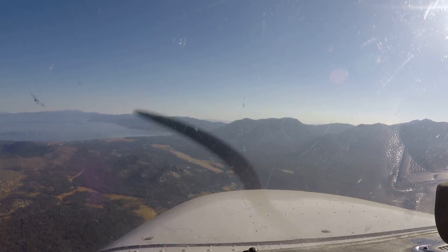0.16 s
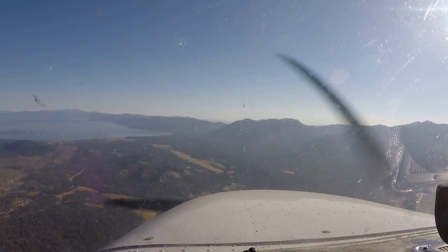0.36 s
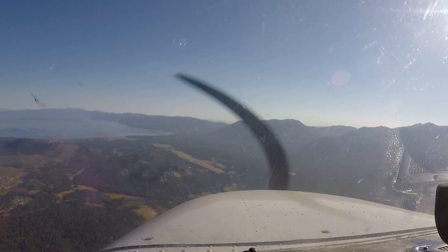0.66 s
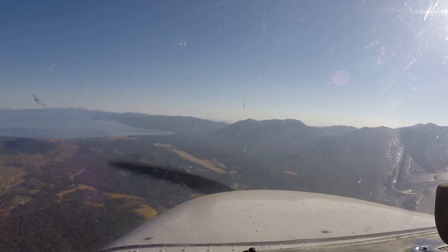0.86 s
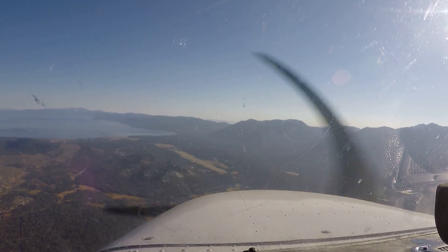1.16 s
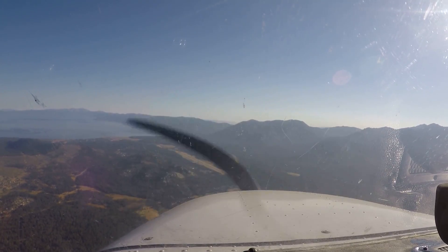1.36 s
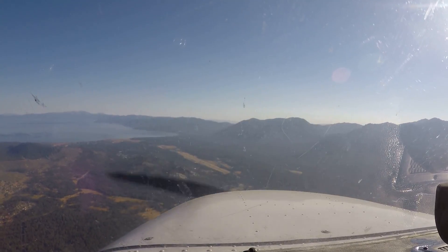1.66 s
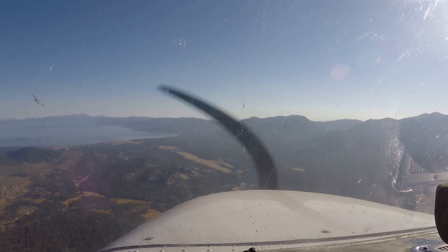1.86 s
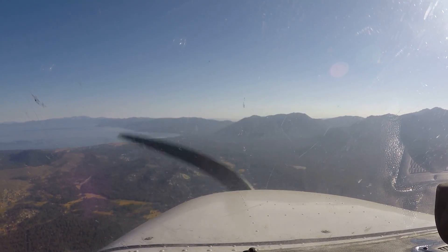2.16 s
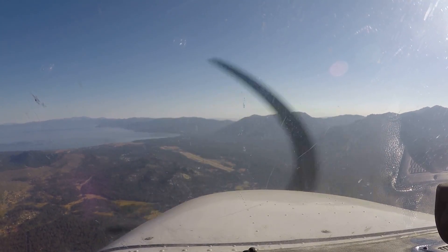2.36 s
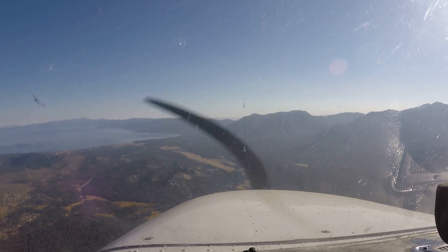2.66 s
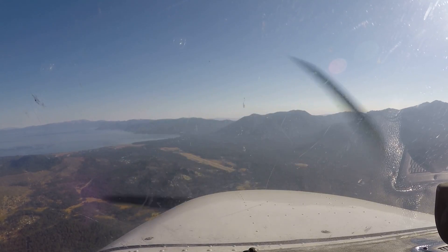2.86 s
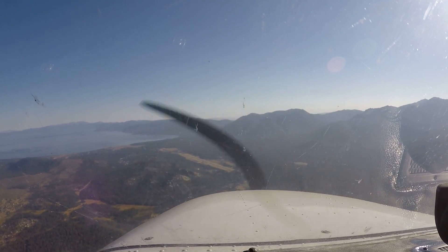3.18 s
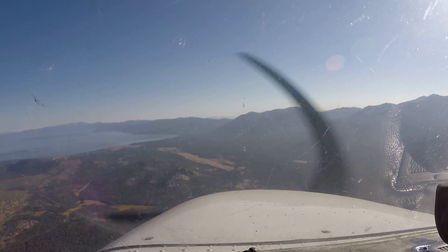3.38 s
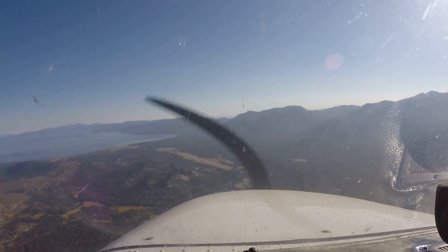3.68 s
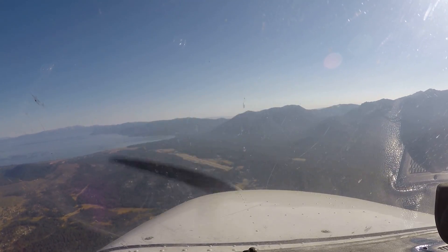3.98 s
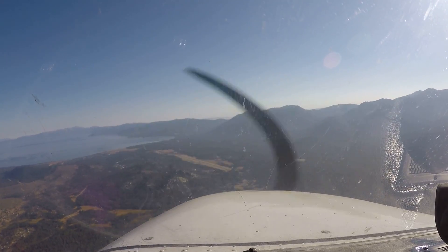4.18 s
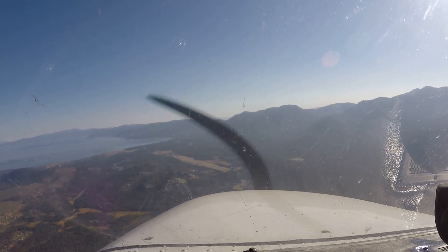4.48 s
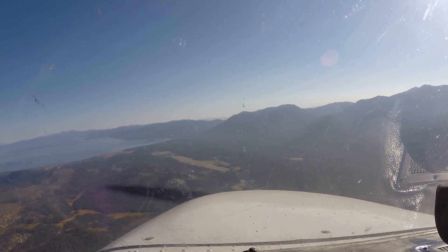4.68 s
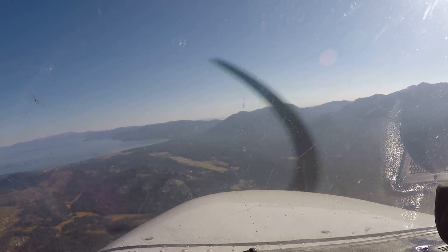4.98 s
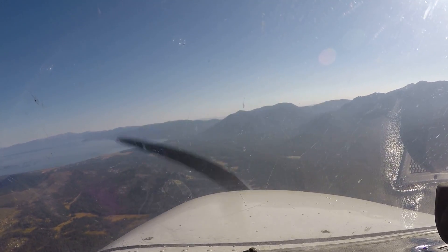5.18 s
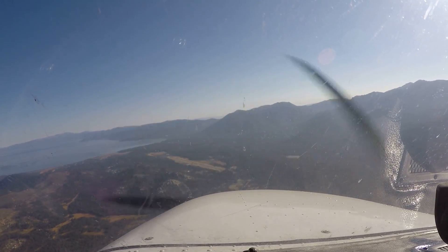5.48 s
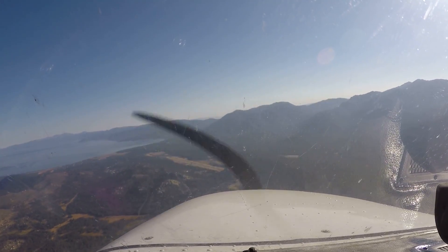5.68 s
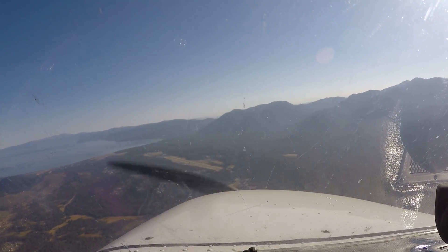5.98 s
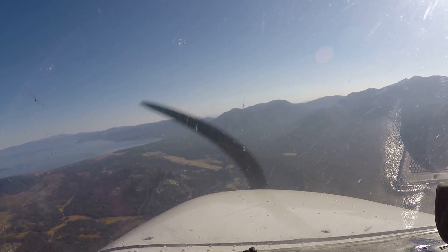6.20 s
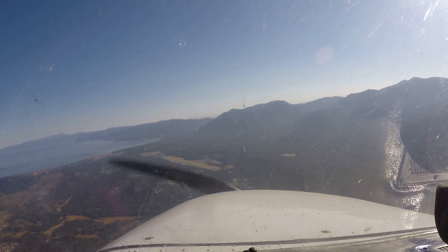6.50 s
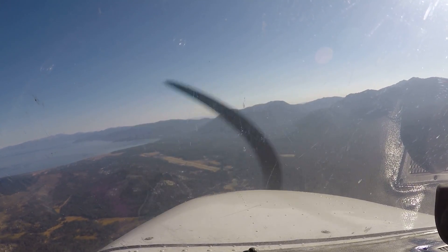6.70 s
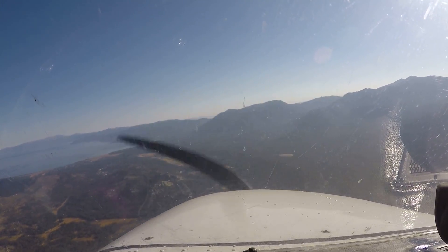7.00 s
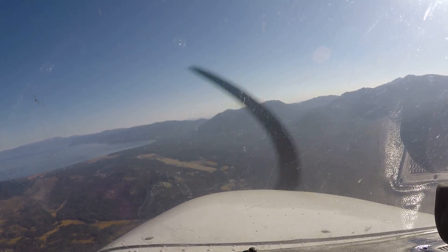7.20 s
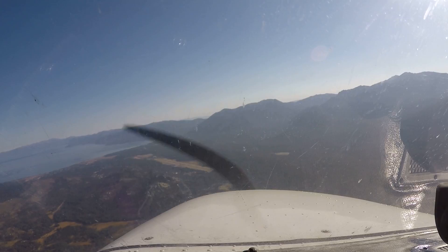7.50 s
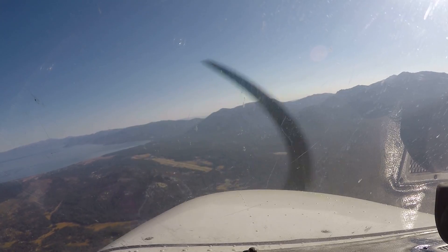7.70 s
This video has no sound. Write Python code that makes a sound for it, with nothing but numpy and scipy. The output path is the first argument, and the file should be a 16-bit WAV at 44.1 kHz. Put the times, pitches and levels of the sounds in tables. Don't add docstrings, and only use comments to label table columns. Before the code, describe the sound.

A small aircraft cockpit drones continuously, low and buzzing, with wavering sub-bass boom, rushing air, faint whistles and one tiny dry rustle.

```python
import sys
import numpy as np
from scipy import signal
from scipy.fft import rfft, irfft, next_fast_len
from scipy.io import wavfile

SR = 44100
rng = np.random.default_rng(int(sys.argv[2]) if len(sys.argv) > 2 else 0)


def nominal_scale(level):
    x = np.asarray(level, float) / 20
    return 10 ** x


def dump_mix(stems):
    frames = np.atleast_2d(stems).T
    limited = np.clip(frames, -1, 1)
    pcm = np.round(limited * 32767).astype(np.int16)
    wavfile.write(sys.argv[1], SR, pcm)


N = 346185

# centre in Hz, width in Hz, rise in dB.
HISS_MODES = [(2400, 120, 0), (2730, 150, 0), (3100, 47, 1.5), (4450, 70, -1), (6220, 90, -1.5),
              (3072, 210, 5.5), (3430, 113, 4.5), (4430, 320, 6.5), (5760, 370, 4), (6260, 230, 7),
              (8520, 350, 3), (9740, 200, 0.5), (10700, 250, 2.5), (12700, 250, 3), (14000, 450, 3)]
# centre in Hz, width in Hz, rise or dip in dB.
CABIN_MODES = [(1054, 30, -2), (1340, 30, -3.5), (1690, 33, -3), (2125, 70, -8), (2330, 30, 2),
               (2800, 40, -1.5), (2944, 130, 3.1), (3015, 49, -2), (3184, 45, -7.5), (3880, 45, -4),
               (4080, 64, 4), (4470, 70, 0.5), (4650, 60, 4), (5340, 100, -3.5), (5490, 70, 4.5),
               (5600, 70, -4.5), (6490, 100, -5.5), (6710, 100, 5), (7200, 100, 1.5), (7418, 100, 1),
               (8172, 100, -5), (8323, 100, 0), (8775, 100, 2), (8990, 100, -4), (11251, 150, 2),
               (12199, 150, 1.5), (12522, 150, -1.7), (13124, 150, 1.9), (13512, 320, -1),
               (14309, 320, 2.3)]


def rms_one(x):
    return x / np.sqrt(np.mean(x ** 2) + 1e-20)


def in_time(rows):
    seconds, *columns = np.transpose(rows)
    return [np.interp(np.arange(N) / SR, seconds, column) for column in columns]


def drift(rate_hz):
    hold = 40
    settle = 2000
    pole = np.exp(-2 * np.pi * rate_hz * hold / SR)
    coarse = rng.standard_normal(N // hold + 2 + settle)
    slow = signal.lfilter([1], [1, -2 * pole, pole * pole], coarse)[settle:]
    return np.interp(np.arange(N) / hold, np.arange(len(slow)), rms_one(slow - slow.mean()))


def coloured(drive, spectrum, modes=()):
    size = next_fast_len(N)
    hz = np.arange(size // 2 + 1) * SR / size + 1e-3
    corner_hz, corner_db = np.transpose(spectrum)
    db = np.interp(np.log(hz), np.log(corner_hz), corner_db, left=-120, right=-120)
    for centre_hz, width_hz, rise_db in modes:
        db += rise_db / (1 + (2 * (hz - centre_hz) / width_hz) ** 2)
    return rms_one(irfft(rfft(drive, size) * nominal_scale(db), size)[:N])


def engine_cycles():
    # time in seconds, firings per second in Hz.
    speed = [(0, 52.38), (2.4, 52.36), (3.35, 51.93), (3.8, 52.07), (4.25, 52.7), (4.65, 52.48),
             (5.4, 52.2), (5.95, 52.4), (6.35, 52.16), (7.0, 52.2), (7.5, 52.0), (7.85, 52.06)]
    firing_hz = in_time(speed)[0]
    return np.cumsum(firing_hz) / 4 / SR


def engine(cycles):
    # multiple of the cycle rate, level in dB rms (multiple 4, the firing hum, takes its level from
    cycle_tones = [(3, -40), (4, -22), (5, -45), (8, -36.5), (12, -49), (13, -52), (16, -48.5), (17, -51),
                   (18, -47.5), (20, -47), (21, -53), (24, -52.5), (26, -56), (28, -56), (30, -60),
                   (31, -61), (32, -63), (34, -63), (52, -50.5), (53, -49.5), (54, -47), (56, -42.5),
                   (57, -51.5), (59, -53.5), (60, -54), (61, -57), (63, -57), (65, -53), (67, -58),
                   (69, -63)]
    # time in seconds, level of the firing hum in dB rms.
    hum = [
        (0, -21),
        (1.9, -21),
        (2.7, -21.5),
        (3.3, -18.5),
        (4.25, -24),
        (5.2, -20),
        (6.1, -22),
        (6.8, -21),
        (7.85, -22.5),
    ]
    hum_db = in_time(hum)[0] - 0.3
    fade_db, fade_hz, wobble_hz = 1.2, 0.85, 1.5
    tones = np.zeros(N)
    for multiple, tone_db in cycle_tones:
        order = round(multiple)
        if order == 4:
            gain = nominal_scale(hum_db)
        else:
            gain = nominal_scale(tone_db + fade_db * drift(fade_hz))
        start_cycles = 0.15 * rng.standard_normal()
        phase = 2 * np.pi * (order * cycles + start_cycles) + 0.12 * drift(wobble_hz)
        tones += np.sqrt(2) * gain * np.sin(phase)
    return tones


def cabin_boom():
    # centre in seconds, depth in dB, half length in seconds.
    lulls = [
        (.52, 14, 0.36),
        (1.0, 5, .2),
        (1.8, 9, 0.4),
        (2.3, 5, .1),
        (2.72, 13, 0.16),
        (4.102, 12, 0.11),
        (6.13, 7, 0.056),
        (7.27, 5.5, 0.055),
        (7.85, 10, .1),
    ]
    t = np.arange(N) / SR
    lost_db = sum(depth_db * np.exp(-((t - s) / half_s) ** 2) for s, depth_db, half_s in lulls)
    hz = 19.4 + 0.55 * drift(0.95)
    return np.sqrt(2) * nominal_scale(-22 - lost_db) * np.sin(2 * np.pi * np.cumsum(hz) / SR)


def shaken_noise(cycles, firing_depth, cylinder_depth, gust_db):
    turn = 2 * np.pi * cycles
    firing = np.cos(4 * turn) + 0.4 * np.cos(8 * turn)
    throb = firing_depth * firing + cylinder_depth * np.cos(3 * turn)
    return rng.standard_normal(N) * (1 + throb) * nominal_scale(gust_db * drift(4.4))


def airframe_buffet(cycles):
    # frequency in Hz, density in dB per Hz.
    buffet_colour = [(9, -36), (13, -4.5), (30, -1), (46, 3.5), (62, -5.5), (100, -2.5), (125, -7.5),
                     (160, -13), (200, -9), (250, -9.5), (300, -13.5), (430, -26), (600, -31)]
    # centre in Hz, width in Hz, rise or dip in dB.
    skin_modes = [(29, 9.7, 3), (48.5, 6.9, 1.5), (62, 8, -3), (148, 10, 2), (94, 10, -4.5), (191.4, 39, 2),
                  (223, 13, -1.5), (242, 28, 2), (285, 23, 1.5), (323, 18, -4), (332, 15, 3),
                  (370, 43, 3.1)]
    drive = shaken_noise(cycles, firing_depth=0.05, cylinder_depth=0.02, gust_db=0.4)
    return nominal_scale(-24.5) * coloured(drive, buffet_colour, skin_modes)


def panel_roar(cycles):
    # frequency in Hz, density in dB per Hz.
    panel_colour = [(300, -24), (430, -3), (600, -1), (900, -2.5), (1400, -0.5), (1650, -4.5), (2200, -5),
                    (2500, -14), (3200, -30)]
    # centre in Hz, width in Hz, rise in dB.
    panel_modes = [(731, 187, 12), (840, 20, 3), (1006, 82, 6), (1156, 47, 4.5), (1238, 100, 6),
                   (1420, 80, 0), (1790, 120, 6.5), (1804, 37, -1), (2054, 170, 6)]
    drive = shaken_noise(cycles, firing_depth=0.11, cylinder_depth=0.06, gust_db=0.3)
    return nominal_scale(-31.5) * coloured(drive, panel_colour, [*panel_modes, *CABIN_MODES])


def airflow_hiss(cycles):
    # frequency in Hz, density in dB per Hz.
    hiss_colour = [(1800, -22), (2400, -0.5), (3600, -1), (4000, -5.5), (4900, -10), (5400, -2.5),
                   (6500, -5), (7000, -12), (7800, -17.5), (11000, -18.5), (11800, -23.5), (13500, -22.5),
                   (15000, -28.5), (16500, -40)]
    drive = shaken_noise(cycles, firing_depth=0.03, cylinder_depth=0.01, gust_db=0.15)
    return nominal_scale(-34.6) * coloured(drive, hiss_colour, [*HISS_MODES, *CABIN_MODES])


def seal_whistle():
    # centre in seconds, peak level in dB, half length in seconds.
    swells = [
        (1.65, -49, .3),
        (2.55, -44, .15),
        (3.3, -50, .2),
        (4.1, -48, .1),
        (4.55, -48, .12),
        (5.65, -48, 0.28),
        (6.4, -43, .12),
        (7.35, -45, 0.17),
    ]
    seal_hz, width_hz = 3070, 90
    t = np.arange(N) / SR
    pole = np.exp(-np.pi * width_hz / SR)
    turn = 2 * np.pi * seal_hz / SR
    gap = [1, 0, -1, 1, -2 * pole * np.cos(turn), pole * pole]
    swell = sum(nominal_scale(db) * np.exp(-((t - s) / half_s) ** 2) for s, db, half_s in swells)
    return swell * rms_one(signal.sosfilt([gap, gap], rng.standard_normal(N)))


def fitting_rustle():
    # time of the peak in seconds, peak level in dB.
    slips = [
        (2.065, -51),
        (3.925, -38),
        (3.988, -45),
    ]
    # frequency in Hz, density in dB per Hz.
    rustle_colour = [(5000, -15), (6500, 2), (7200, -3), (8000, -8), (8800, -8), (10500, -13), (12000, -18)]
    rise_db_per_s, fade_db_per_s = 900, 260
    t = np.arange(N) / SR
    grains = rng.standard_normal(N) * nominal_scale(1.2 * rng.exponential(1, N))
    scratch = np.zeros(N)
    for s, peak_db in slips:
        scratch += nominal_scale(peak_db - np.maximum(rise_db_per_s * (s - t), fade_db_per_s * (t - s)))
    return scratch * coloured(grains, rustle_colour, [*HISS_MODES, *CABIN_MODES])


def scene():
    cycles = engine_cycles()
    tones = engine(cycles) + cabin_boom()
    airflow = airframe_buffet(cycles) + panel_roar(cycles) + airflow_hiss(cycles)
    small_sounds = seal_whistle() + fitting_rustle()
    return (tones + airflow + small_sounds)[None]


def roll_off(x):
    return signal.sosfilt(signal.butter(12, 15420, fs=SR, output="sos"), x)


def record(dry):
    rounded = 0.76 * np.tanh(dry / 0.77)
    return roll_off(rounded)


dry = scene()
out = record(dry)
dump_mix(out)
```